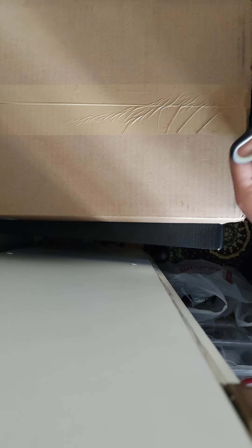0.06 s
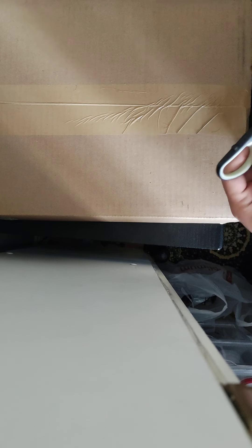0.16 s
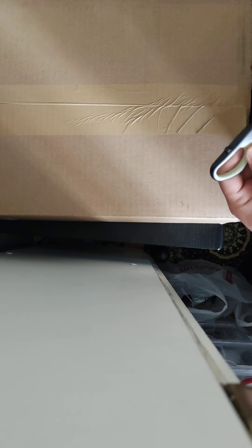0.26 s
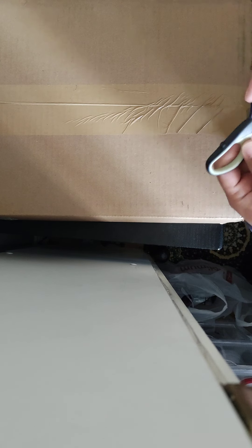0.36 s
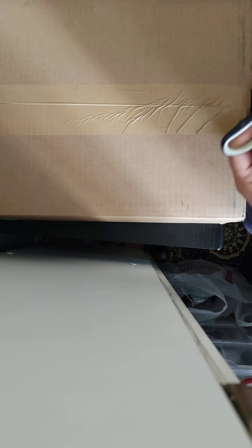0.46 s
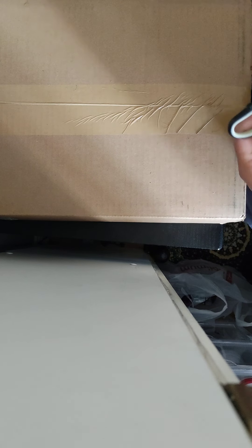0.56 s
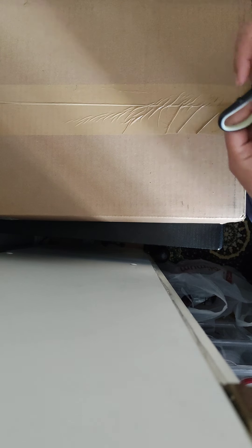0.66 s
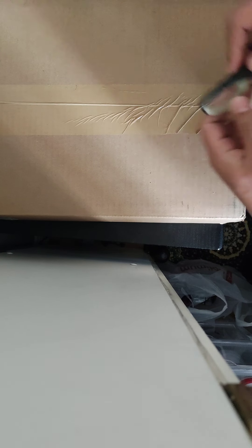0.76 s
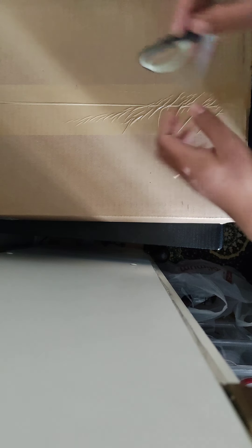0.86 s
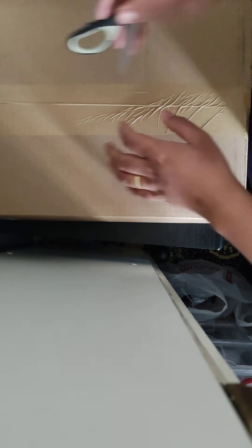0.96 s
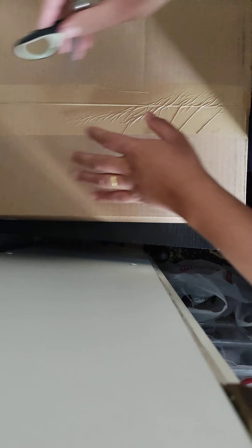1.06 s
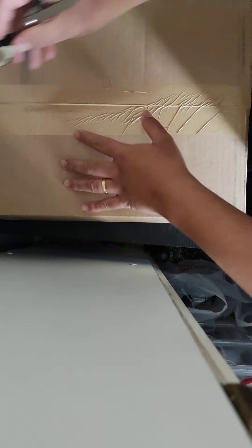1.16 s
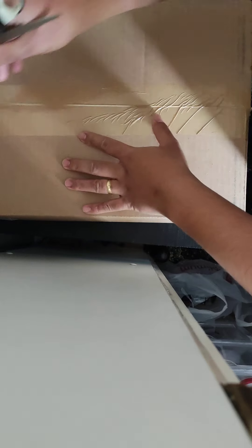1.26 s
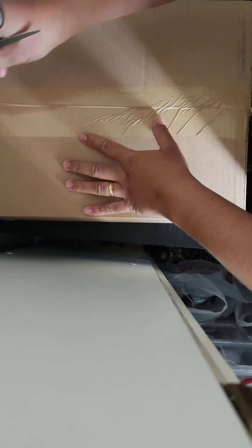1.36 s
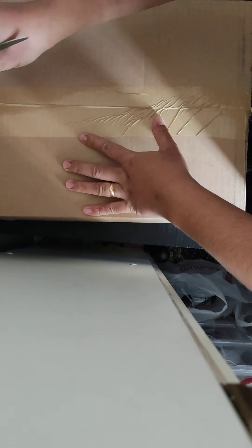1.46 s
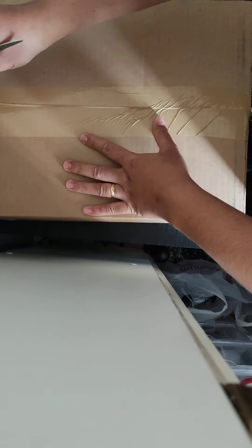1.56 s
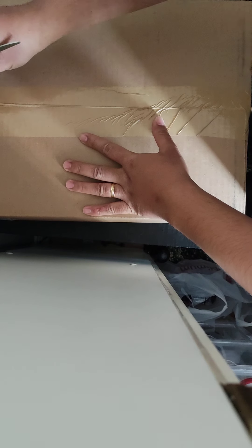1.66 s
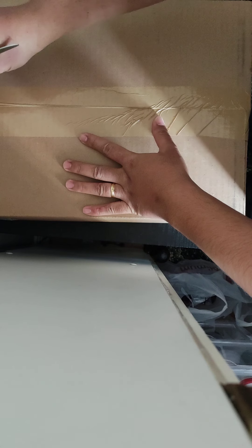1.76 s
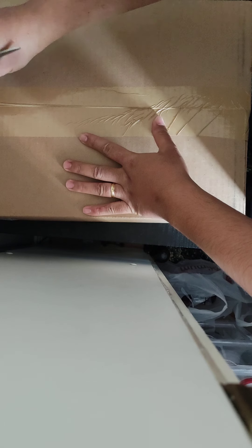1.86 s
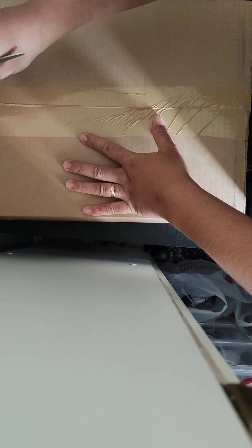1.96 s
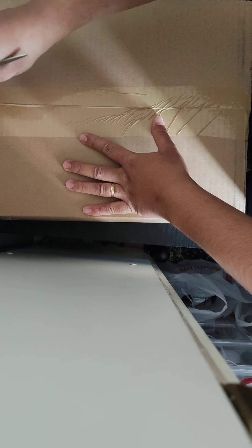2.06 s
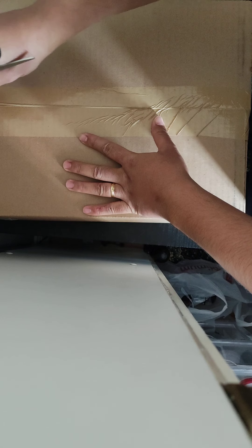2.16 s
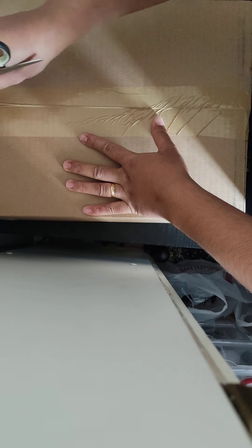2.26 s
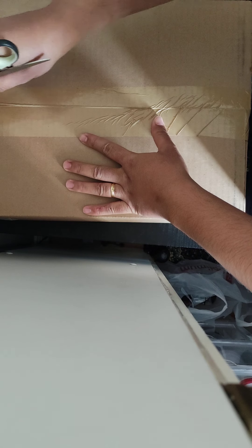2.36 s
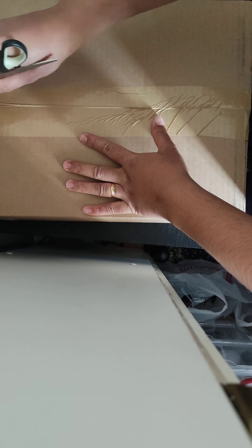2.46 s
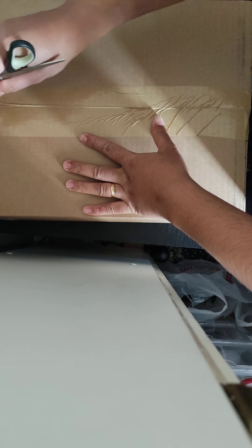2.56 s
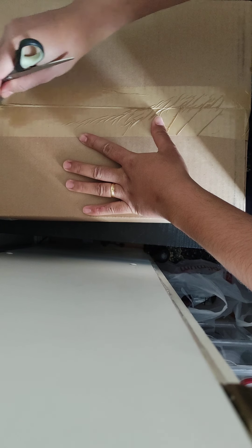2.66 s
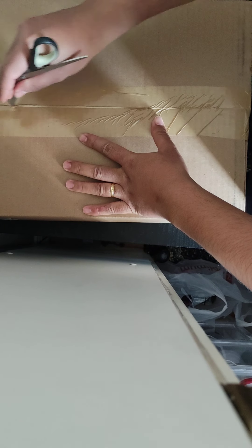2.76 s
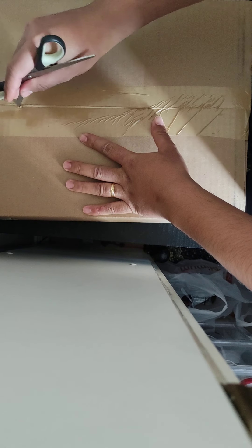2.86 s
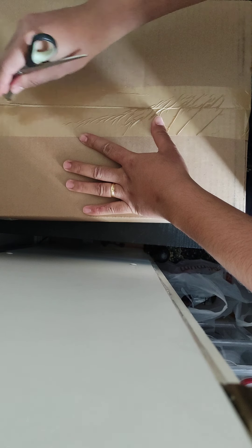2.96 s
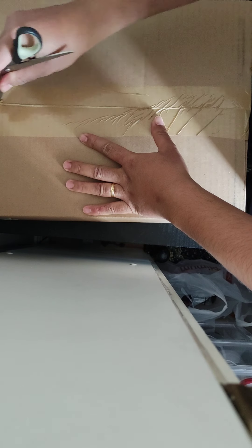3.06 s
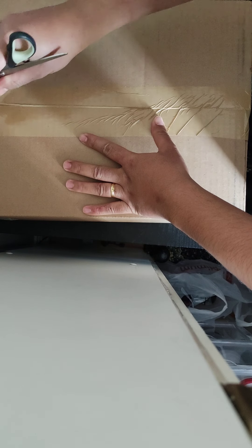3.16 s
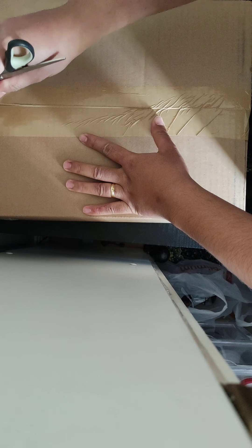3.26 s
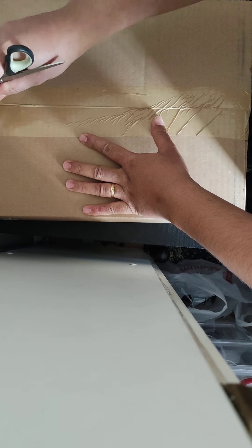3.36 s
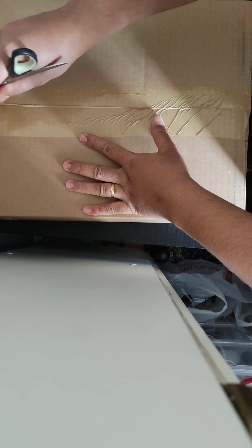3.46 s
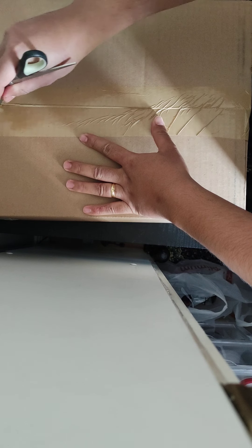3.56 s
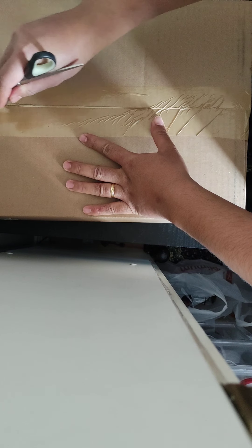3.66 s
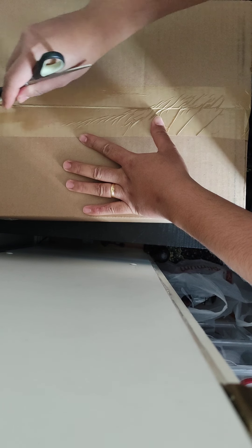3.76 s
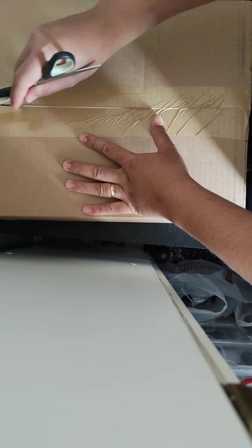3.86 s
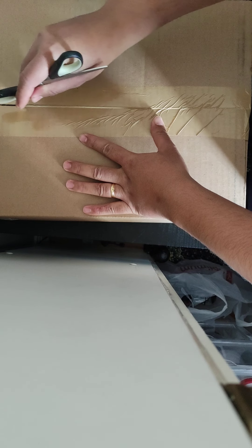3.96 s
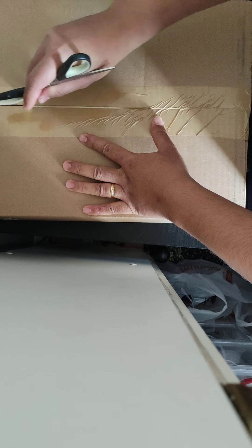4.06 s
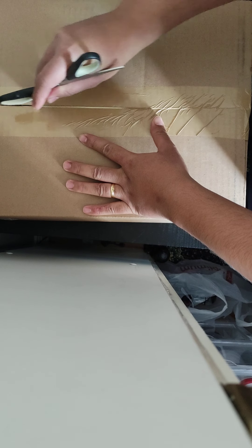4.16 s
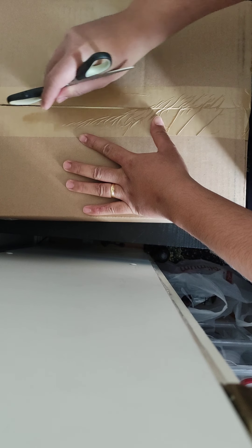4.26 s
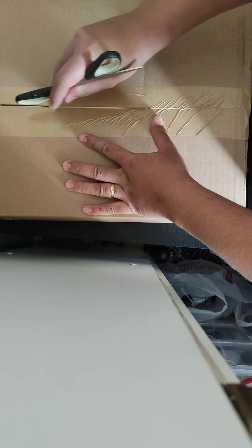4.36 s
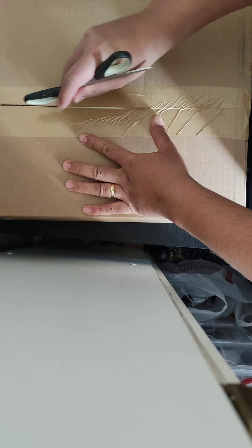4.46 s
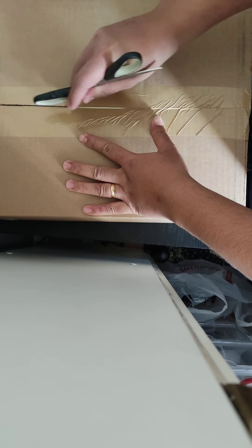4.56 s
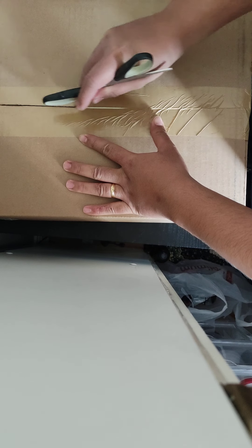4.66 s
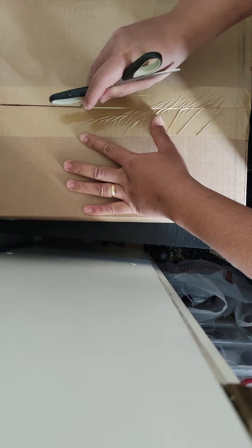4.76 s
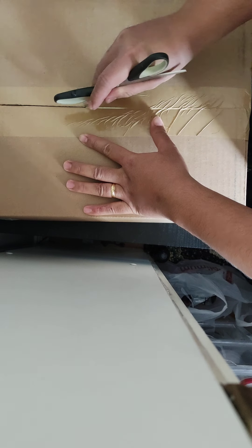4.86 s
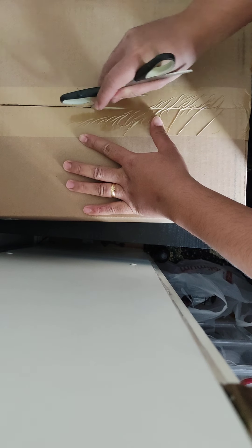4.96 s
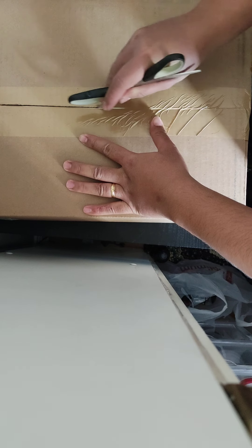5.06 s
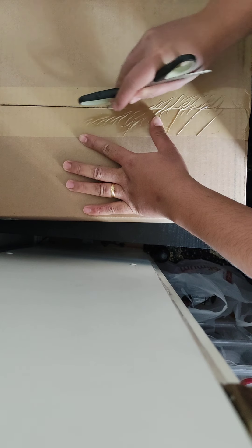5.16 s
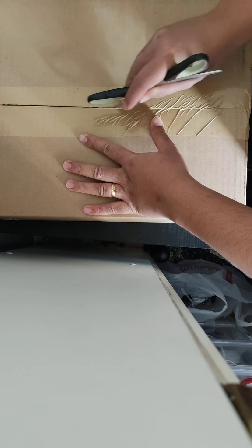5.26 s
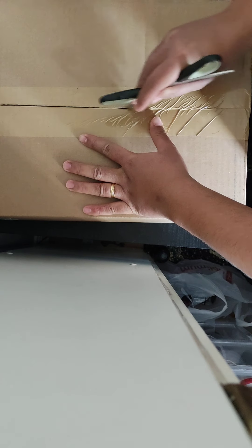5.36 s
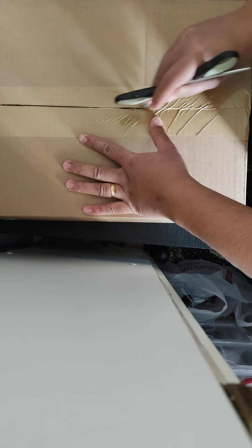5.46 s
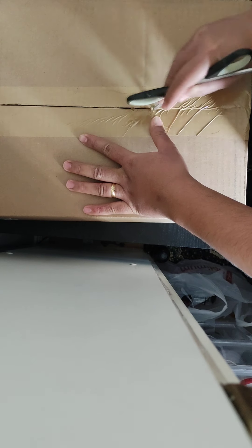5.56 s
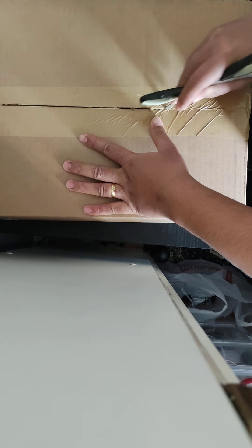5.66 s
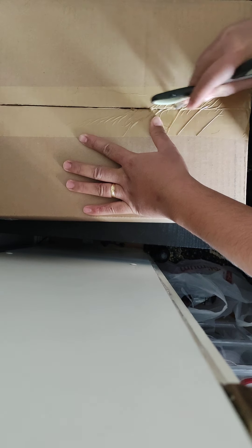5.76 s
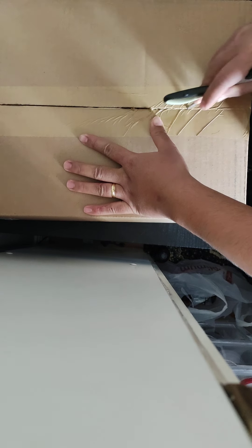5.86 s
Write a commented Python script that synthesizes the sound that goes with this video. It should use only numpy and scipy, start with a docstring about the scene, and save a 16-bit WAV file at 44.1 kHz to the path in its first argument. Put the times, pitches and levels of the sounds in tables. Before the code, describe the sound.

A blade scrapes in jerks along a taped cardboard box, ripping tape with hollow bumps, after small ticks and rubs in a quiet room.

```python
"""A blade scrapes along a taped cardboard box in jerks, with booms, rips, ticks, knocks and two faint squeaks.
Further off something knocks once, over quiet room and microphone noise in a small room.
Scraping and rips are many tiny random pushes sent through the ringing of walls, panels, edges and microphones;
knocks are short swings sent through the box ringing. A phone hears it all: its left microphone port is nearer
and rings near 7.5 kHz, the right one is shaded above 8 kHz."""
import sys
import numpy as np
from scipy import signal
from scipy.fft import rfft, irfft
from scipy.io import wavfile
from scipy.ndimage import uniform_filter1d

SR = 44100
rng = np.random.default_rng(int(sys.argv[2]) if len(sys.argv) > 2 else 0)


def master_out(mix):
    """Clip the mix to full scale and print it as 16-bit PCM to the path in sys.argv[1]."""
    frames = np.transpose(np.atleast_2d(mix))
    ceiling = np.clip(frames, -1, 1)
    pcm = np.round(ceiling * 32767).astype(np.int16)
    wavfile.write(sys.argv[1], SR, pcm)


N = 260631

# Room and microphone noise. Each row: frequency in Hz, relative level in dB.
FLOOR_COLOUR = [(8.8, -43), (15, 6), (48, -28), (81, -15.5), (174, -30.5), (262, -24), (512, -34),
                (610, -29.5), (770, -35), (1090, -37), (16000, -44.5)]
FLOOR_DB = -62  # rms level of the two ports averaged together
# Faint hums shared by both ports. Each row: frequency in Hz, width in Hz, rms level in dB.
HUMS = [(254.3, 12, -73.5), (580, 150, -91), (72.8, 15, -66.5)]
# Ring of the left port in the noise: frequency in Hz, width in Hz, rms level in dB before it drifts.
LEFT_PORT_RING = (7650, 890, -71.5)

# Colour of the far knock. Each row: frequency in Hz, left and right relative level in dB.
FAR_COLOUR = [(60, -18, -22), (129, -1, -9), (191, 7.5, 9), (276, 2, -16), (370, -7, -3.5), (454, -8, -6.5),
              (700, -8.5, -5.5), (1360, -12.5, -5.5), (2230, -15, -11), (4670, -35, -31), (5700, -36, -27),
              (7700, -14, -20), (8760, -29, -38), (13000, -49, -44)]
# start in s, level in dB before the echoes are mixed, rise time in s, time to fall 60 dB in s
FAR_AT_S, FAR_DB, FAR_RISE_S, FAR_T60_S = 0.2383, -37, 0.0032, .2

# Thin squeaks. Each row: start in seconds, length in seconds, pitch at both ends in Hz,
# bend at the middle in Hz, level in dB before it swells and flutters.
SQUEAKS = [(2.18, .72, 5580, -110, -78), (4.86, .4, 5330, 270, -75)]

# Ringing of the box. Each row: frequency in Hz, width in Hz, left and right relative level in dB.
WALLS = [(51.4, 116, -6.5, -4), (72.8, 34.4, -0.5, -2.5), (93.4, 86, -0.5, -11), (143.7, 55.3, 2, -5),
         (191, 8.2, -14.5, -11)]
PANELS = [(279, 57.6, -0.5, -4.5), (323.3, 19.4, 2.5, -1.5), (410.3, 51, 3.5, -1), (479, 23.6, -1, -4.5),
          (576, 52, -1.5, 0), (748, 16.4, 0, -1), (801, 230, -10.5, -9), (949, 19, -6.5, -9)]
EDGES = [(1055, 115, 1, 2), (1163, 49, 6, -3), (1280, 18, 3.5, 3), (1388, 85, 3.5, 0), (1564, 68, 3, -3),
         (1776, 145, -3, -5.5), (2000, 98, 0, -24), (2217, 25, -17.5, 2), (2266, 190, -6, -22),
         (2510, 480, -3, -12), (3110, 1080, -7.5, -13.5), (3980, 85, -20.5, -16)]
# How each port colours tape hiss. Each row: frequency in Hz, left and right relative level in dB.
HISS_COLOUR = [(2300, -39.5, -20), (4030, -8.5, -19), (5930, -11, -21), (6910, -3.5, -17.5),
               (7970, 4.5, -31), (7610, -2.5, -18.5), (9280, -14, -39), (11100, -19, -37),
               (15900, -59.5, -38)]
# How each port colours the main ring of a tick. Each row: frequency in Hz, left and right relative level in dB.
SNAP_COLOUR = [(900, -42, -47), (1800, -30, -36), (2270, -31, -40), (3380, -23.5, -32.5), (4700, -30, -37),
               (5840, -22.5, -31), (7390, -1.5, -28), (8430, -13.5, -38), (9500, -34, -50),
               (15800, -71, -51)]
# How each port colours the very top. Each row: frequency in Hz, left and right relative level in dB.
TOP_COLOUR = [(5770, -17, -27), (9200, 2.5, -5), (11050, 8.5, -14), (13800, 2.5, -10.5), (16000, -4, -19)]

# Peak levels in the tables below are for the direct sound, averaged over the ports, before echoes.
# Knocks on the box; the first row is the low thump of the far knock.
# Each row: start in seconds, peak level in dB, wobble in Hz, number of swings.
KNOCKS = [(0.237, -32, 221, 2.26), (1.266, -43.5, 394, 2), (1.267, -38.5, 62, 1.13),
          (1.291, -39.5, 130, 1.22), (2.16, -36.5, 165, 2.4), (2.404, -37.5, 187, 1.5),
          (2.717, -44.5, 132.6, 3), (3.065, -48.5, 121, 2.3), (3.807, -40, 99, 1.9),
          (3.965, -28, 191, 5.24), (4.9, -38, 139, 2.2), (5.515, -36, 153, 3.8), (5.653, -28.5, 153, 2.3),
          (5.661, -27, 1146, 5.5), (5.7, -40, 155, 3.9), (5.746, -31, 255, 4.1), (5.812, -37.5, 165, 1.9),
          (5.858, -52, 159, 2.1)]
# Sharp ticks of tape and scissors. Each row: start in seconds, then peak level in dB of the main ring,
# of the dull part and of the top part, length in seconds.
TICKS = [(1.6103, -35, -57, -44, 0.00023), (1.7606, -41, -50, -67, 0.0012), (1.765, -16, -46, -42, 0.0009),
         (1.779, -39, -53, -53, 0.0015), (1.8651, -38.5, -49.5, -65, 0.0031), (2.014, -54, -53, -73, 0.002),
         (2.0845, -35.5, -48, -43, 0.00071), (2.101, -38.5, -72, -69, 0.0024),
         (2.1594, -40, -50, -49, 0.0011), (2.2154, -33, -44.5, -45, 0.0029), (2.645, -36, -51, -47, 0.0023),
         (2.671, -41.5, -49, -54, 0.0016), (2.819, -42, -57, -72, 0.0017), (2.8754, -37, -67, -52, 0.0011),
         (3.0643, -48, -79, -73, 0.0027), (3.668, -41, -73, -56, 0.0022), (3.777, -38.5, -77, -56, 0.0035),
         (4.126, -34.5, -44, -36, 0.00062), (5.658, -23, -24.5, -55, 0.00056),
         (5.7037, -30, -41, -54, 0.0011)]
# Lone jerks of skin and blade. Each row: start in seconds, tape peak level in dB,
# weight on the board in dB against the tape, length in seconds.
JERKS = [(1.263, -54.5, 11, 0.011), (1.291, -50.5, -4, 0.0039), (1.78, -38, -12, 0.0071),
         (2.1625, -39, 1.5, 0.0072), (2.28, -52, 1, 0.0062), (2.412, -46, 6.5, 0.012),
         (2.468, -48, 7, 0.0058), (2.517, -55, 12, 0.019), (2.724, -52, 12, 0.0039),
         (2.738, -46.5, -11, 0.01), (3.385, -50, -3, 0.022), (3.417, -51, -0.5, 0.007),
         (3.804, -51, 13.5, 0.016), (3.89, -61.5, 25, 0.021), (3.927, -53, 20, 0.018),
         (3.969, -59, 24.5, .007), (5.4745, -42.5, 6.5, 0.008), (5.512, -33.5, 6, 0.018),
         (5.561, -36, 2, 0.0057), (5.606, -44, -10, 0.0079), (5.655, -23.5, -1, 0.0068),
         (5.677, -41, 11, 0.01), (5.705, -36.5, 4, 0.0047), (5.715, -43, 6, 0.0091),
         (5.7517, -35, 8.5, 0.0029), (5.814, -44, 10, 0.0074), (5.8575, -37, 8.5, 0.0063),
         (5.885, -38, 6, 0.014)]
# Ridges where the blade sticks. Each row: catch time in seconds, delay until it lets go in seconds,
# let-go peak level in dB, change of the drag level while stuck in dB.
RIDGES = [(4.056, 0.025, -51, -12.5), (4.171, 0.025, -48, 1), (4.222, 0.021, -49.5, 1),
          (4.296, 0.022, -45, 1.5), (4.363, 0.034, -48, -2.5), (4.443, 0.017, -46.5, -0.5),
          (4.5136, 0.019, -44, 0.5), (4.5775, 0.026, -42.5, 2), (4.648, .023, -43.5, -1.5),
          (4.714, 0.022, -42, 0), (4.773, .024, -40.5, -6), (4.884, .024, -44.5, -1.5), (5, 0.027, -44, 1),
          (5.094, .026, -45.5, -6), (5.167, 0.024, -45, -12), (5.28, 0.023, -50, -3),
          (5.37, 0.023, -46, -7)]
# Rubbing of hand and blade over the box. Each row: time in seconds, base level in dB.
DRAG_LEVEL = [(1.32, -76), (1.45, -81.5), (1.68, -81), (2.12, -77.5), (2.2, -63), (2.3, -64), (2.42, -56),
              (2.54, -62), (2.59, -66.5), (2.73, -68.5), (2.9, -71.5), (2.97, -85.5), (3.08, -73),
              (3.32, -84.5), (3.48, -80.5), (3.56, -74), (3.63, -77), (3.72, -69.5), (3.85, -65.5),
              (4.16, -59.5), (4.34, -57.5), (4.69, -58), (4.81, -57), (4.86, -61), (4.96, -70), (5.14, -56),
              (5.36, -54), (5.47, -51.5), (5.63, -55), (5.69, -48.5), (5.8, -57), (5.91, -48.5)]
# Where hand and blade are decides what sounds. Each row: time in seconds, then wall boom,
# panel scrape, tape hiss and fibre crackle in dB against the base level.
PLACE = [(1.4, 9, 7, -3.5, -11), (2.1, 5.7, 3.5, 1.5, -13), (2.45, 7.1, 4, -4.5, -19),
         (2.8, 13.3, 8, 3.5, -12), (3.2, 15, 7.5, 0.5, -13), (3.75, 11, 3.5, 0, -21),
         (3.95, 13, 12, -5, -19), (4.3, 11.8, 10, -6, -17), (4.7, 13.3, 3, -5, -17.5), (5.0, 20, 4, 4, -10),
         (5.4, 14.4, 7.5, -4.5, -13.5), (5.9, 9.2, 3.5, -5, -16)]

# stuck time before the catch, catch level against the let-go, length of each rip
STUCK_S, CATCH_DB, RIDGE_S = 0.057, -3, 0.0051
# parts of a ridge sound against its peak; panel and wall then add the place
RIDGE_EDGE_DB, RIDGE_PANEL_DB, RIDGE_WALL_DB = 0.5, 2, -9
RIDGE_HZ, RIDGE_SWINGS = 135, 2.34
EDGE_DB, EDGE_SHARE = -5.5, .6  # in a lone jerk the edges take this share of the weight
ROOM_T60_S, ROOM_GAP_S = 0.12, 0.00043  # time for echoes to fall 60 dB; wait before they begin
TOP_HZ = 15720


def undb(db):
    """Turns decibels into a plain factor."""
    return 10 ** (np.asarray(db) / 20)


def unit(x):
    """Scales a sound to rms 1."""
    return x / np.sqrt(np.mean(x ** 2))


def ring(hz, width, size=8192):
    """A damped sine with gain close to 1 at its centre; a wider resonance dies sooner."""
    t = np.arange(size) / SR
    fade = np.exp(-np.pi * width * t)
    return 2 * np.pi * width / SR * fade * np.sin(2 * np.pi * hz * t)


def modes(table):
    """Adds up resonances at both ports; neighbours swing in opposite sense, and deep rumble is cut."""
    body = 0
    for k, (hz, width, left_db, right_db) in enumerate(table):
        body = body + (-1) ** k * np.outer(undb([left_db, right_db]), ring(hz, width))
    return signal.lfilter(*signal.butter(2, 38, "high", fs=SR), body)


def colour(table, size=8192):
    """Builds a response with the listed gain at both ports that starts at once, never early."""
    hz, *levels_db = np.transpose(table)
    log_hz = np.log(np.arange(size // 2 + 1) * SR / size + 1)
    gains = [undb(np.interp(log_hz, np.log(hz), db)) for db in levels_db]
    # folding the cepstrum (spectrum of the log gain) moves all the energy after time zero
    cepstrum = irfft(np.log(gains))
    cepstrum[:, 1:size // 2] *= 2
    cepstrum[:, size // 2 + 1:] = 0
    return irfft(np.exp(rfft(cepstrum)))


def even_gain(body):
    """Scales a response so that the average of its ports has energy 1."""
    return body / np.sqrt(np.sum(body.mean(axis=0) ** 2))


def play(force, response):
    """Lets a push shake a body, giving the sound at each port."""
    return signal.fftconvolve(np.atleast_2d(force), response, axes=1)[:, :N]


def heard(force, body, right_lag_s, left_echo_db, right_echo_db):
    """The right port hears later; each port gets its own dense wash of wall echoes that follows the loudness."""
    t = np.arange(int(.4 * SR)) / SR
    fade = np.exp(-2 * np.log(1000) * t / ROOM_T60_S) * (t > ROOM_GAP_S)  # energy, hence the 2
    wash = np.sqrt(np.abs(signal.fftconvolve(force ** 2, fade / fade.sum())[:N]))
    echoes = wash * rng.standard_normal((2, N)) * undb([[left_echo_db], [right_echo_db]])
    direct = np.array([force, np.roll(force, round(right_lag_s * SR))])
    return play(direct + echoes, body)


def walk(rate):
    """A random wandering level: each value is aimed at for 1 / rate seconds, with glides between."""
    k = int(SR / rate)
    steps = np.repeat(rng.standard_normal(N // k + 1), k)
    return 1.2 * uniform_filter1d(steps, k)[:N]


def place(s, index):
    """Reads one column of the place table at time s."""
    table = np.array(PLACE)
    return np.interp(s, table[:, 0], table[:, index])


def bumps():
    """Lists the catch and let-go of every ridge as start in seconds and peak level in dB."""
    rows = []
    for s, delay, db, _ in RIDGES:
        rows += [(s, db + CATCH_DB), (s + delay, db)]
    return rows


def add(force, s, db, push, body):
    """Lays a push into the force track so that its sound, averaged over the ports, peaks at db."""
    peak = np.abs(signal.fftconvolve(push, body.mean(axis=0)[:2048])).max()
    part = force[int(s * SR):][:len(push)]
    part += (undb(db) * push / peak)[:len(part)]


def sprays(table, bodies, paths):
    """Each row is a spray of cracks that swells fast and dies away, sounding in several bodies at once."""
    t = np.arange(4096) / SR
    forces = np.zeros((len(bodies), N))
    for s, *levels_db, length in table:
        noise = rng.standard_normal(len(t))
        x = 3 * t / max(length, 1 / SR)
        burst = (np.sign(noise) + .5 * noise) * x * np.exp(-x)
        for force, db, body in zip(forces, levels_db, bodies):
            add(force, s, db, burst, body)
    return sum(heard(force, body, *path) for force, body, path in zip(forces, bodies, paths))


def quiet():
    """Coloured noise that differs at the two ports, faint shared hums, and the drifting ring of the left port."""
    hz, db = np.transpose(FLOOR_COLOUR)
    noise = rng.standard_normal((2, N)) + .5 * rng.standard_normal(N)  # partly shared
    air = play(noise, colour(np.transpose([hz, db, db])))
    out = undb(FLOOR_DB) * air / np.std(air.mean(axis=0))
    for hz, width, db in HUMS:
        out = out + undb(db) * unit(play(rng.standard_normal(N), ring(hz, width)[None]))
    hz, width, db = LEFT_PORT_RING
    drift = undb(db + 4.5 * walk(3.4))
    out[0] += drift * unit(play(rng.standard_normal(N), ring(hz, width)[None])[0])
    return out


def far_knock():
    """Noise like dense echoes: it swells for a moment and dies with the room."""
    t = np.maximum(np.arange(N) / SR - FAR_AT_S, 0)
    swell = (1 - np.exp(-t / FAR_RISE_S)) * np.exp(-np.log(1000) * t / FAR_T60_S)
    noise = rng.standard_normal(N) + 1.3 * rng.standard_normal((2, N))  # shared plus each port's own
    return play(noise * swell, undb(FAR_DB) * even_gain(colour(FAR_COLOUR)))


def squeak():
    """Sine tones that waver in pitch and flutter in level while they swell, bend and fade."""
    t, out = np.arange(N) / SR, 0
    waver_hz, flutter = 17 * walk(120), undb(3.5 * walk(40))
    for s, length, hz, bend_hz, db in SQUEAKS:
        arch = np.sin(np.pi * np.clip((t - s) / length, 0, 1))
        phase = 2 * np.pi * np.cumsum(hz + bend_hz * arch + waver_hz) / SR
        tone = np.sin(phase + np.array([[0], [1]]))  # the right port is 1 radian ahead
        out = out + np.sqrt(2) * undb(db) * arch * flutter * tone
    return out


def knocks():
    """Finger, blade and ridges push the board, which swings briefly; the far knock's thump is made the same way."""
    body = modes(WALLS) + undb(-1) * modes(PANELS) + undb(-20.0) * modes(EDGES)
    force = np.zeros(N)
    ridges = [(s, db + RIDGE_WALL_DB + place(s, index=1), RIDGE_HZ, RIDGE_SWINGS) for s, db in bumps()]
    for s, db, hz, swings in list(KNOCKS) + ridges:
        t = np.arange(int(max(swings, .5) / hz * SR)) / SR
        push = np.sin(2 * np.pi * hz * t) * np.sin(np.pi * t / t[-1])
        add(force, s, db, push, body)
    return heard(force, body, 0.000093, -8, -8.5)


def ticks():
    """Tape letting go and steel touching steel: short sprays ring the ports and the box edges."""
    # Each row: right lag in seconds, left echo in dB, right echo in dB.
    paths = [(.00048, -12, 7), (.00048, -12.5, -7), (.00048, -26, 6)]
    return sprays(TICKS, [colour(SNAP_COLOUR), modes(EDGES), colour(TOP_COLOUR)], paths)


def jerks():
    """The blade jumps a ridge of the board and rips a bit of tape, shaking tape, edges and panels."""
    rows = []
    for s, db, weight_db, length in JERKS:
        rows.append((s, db, db + EDGE_DB + EDGE_SHARE * weight_db, db + weight_db, length))
    for s, db in bumps():
        panel_db = db + RIDGE_PANEL_DB + place(s, index=2)
        rows.append((s, db, db + RIDGE_EDGE_DB, panel_db, RIDGE_S))
    tape = colour(HISS_COLOUR) + undb(-24.5) * colour(TOP_COLOUR)
    # Each row: right lag in seconds, left echo in dB, right echo in dB.
    paths = [(.00048, -6.0, 8.0), (0.00051, 0, 1.0), (0.00038, -4.0, -9)]
    return sprays(rows, [tape, modes(EDGES), modes(PANELS)], paths)


def slips(per_s, spread_db):
    """Stick-slip pushes at chance moments, a few much bigger than the rest; rms 1."""
    pushes = (rng.random(N) < per_s / SR) * rng.standard_normal(N)
    size_db = spread_db * np.minimum(rng.exponential(size=N), 4.5)
    return unit(pushes * undb(size_db))


def drag():
    """The blade sticks and slips: one uneven grip drives boom, scrape, rasp, hiss and crackle together."""
    t = np.arange(N) / SR
    level_db = np.interp(t, *np.transpose(DRAG_LEVEL), left=-120)
    for s, _, _, hush_db in RIDGES:
        stuck = np.interp(t, [s - STUCK_S, s - STUCK_S / 4, s], [0, 1, .5], right=0)
        level_db = level_db + hush_db * stuck
    grip = walk(130)
    boom_db, scrape_db, hiss_db, crackle_db = [place(t, index=k) for k in (1, 2, 3, 4)]
    # Each row: level in dB, body, slips per second, spread in dB, grip swing in dB,
    # right lag in seconds, left echo in dB, right echo in dB.
    layers = [(boom_db, modes(WALLS), 890, 1.15, 1.65, .0001, -27, -15),
              (scrape_db, modes(PANELS), 3577, 0.8, 1.87, 0.00033, -5.5, -2.5),
              (0, modes(EDGES), 2030, 2.86, 1.76, 0.00045, -3.5, -0.5),
              (hiss_db, colour(HISS_COLOUR), 3543, 2.52, 2.9, .00048, -4.0, 9.0),
              (crackle_db, colour(TOP_COLOUR), 4870, 1.7, 4.9, .00048, -10, 8.5)]
    out = 0
    for db, body, per_s, spread_db, grip_db, *path in layers:
        force = undb(level_db + db + grip_db * grip) * slips(per_s, spread_db)
        out = out + heard(force, even_gain(body), *path)
    return out


def scene():
    """Adds the dragged blade and all the smaller sounds around it."""
    return drag() + jerks() + ticks() + knocks() + squeak() + far_knock() + quiet()


def record(dry):
    """The phone cuts the top with a steep low-pass filter."""
    return signal.sosfilt(signal.ellip(12, .2, 90, TOP_HZ, fs=SR, output="sos"), dry)


dry = scene()
out = record(dry)
master_out(out)
```